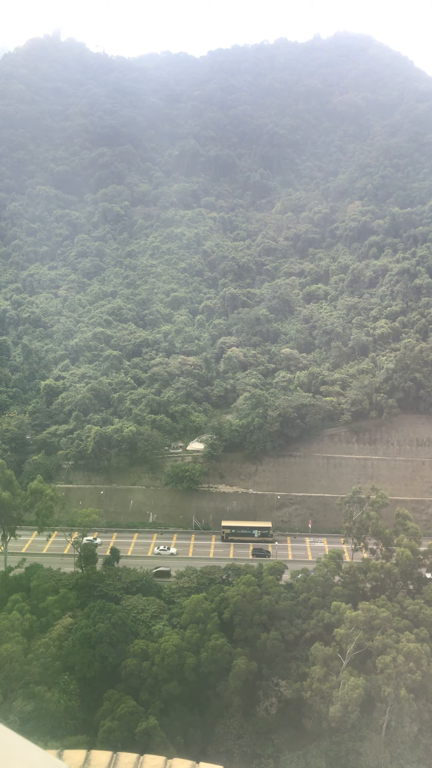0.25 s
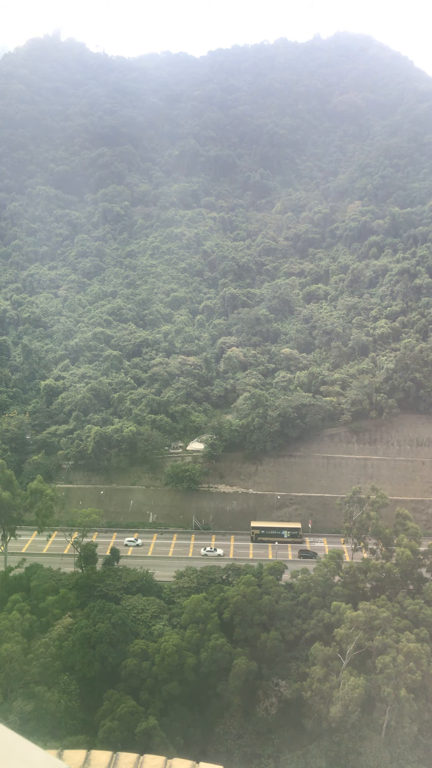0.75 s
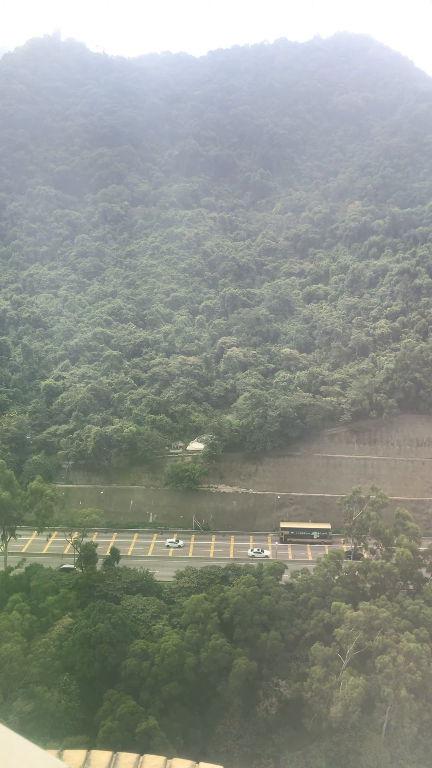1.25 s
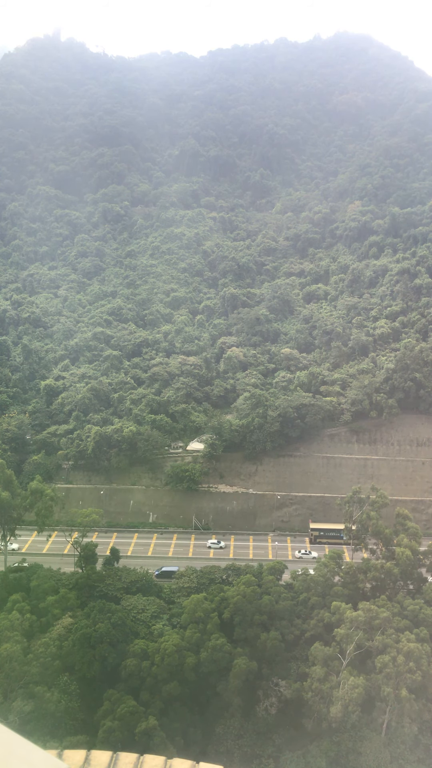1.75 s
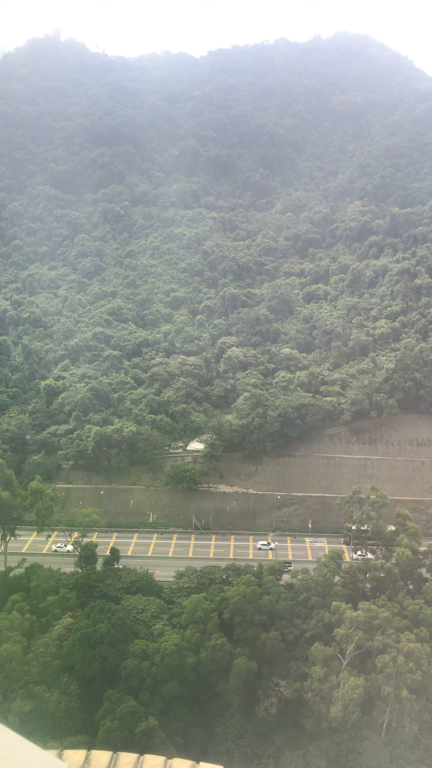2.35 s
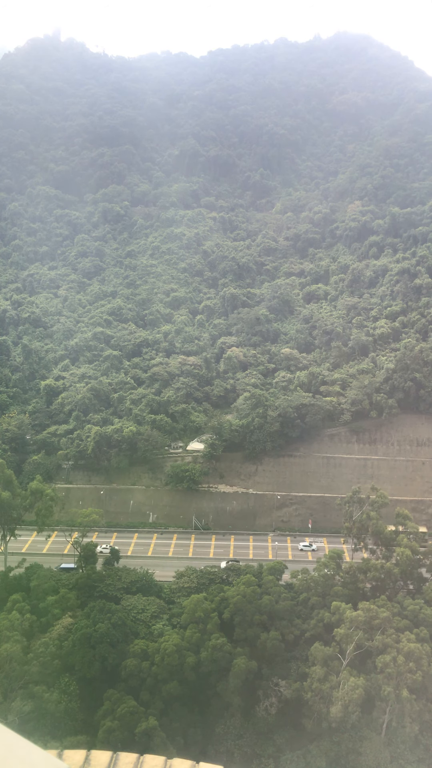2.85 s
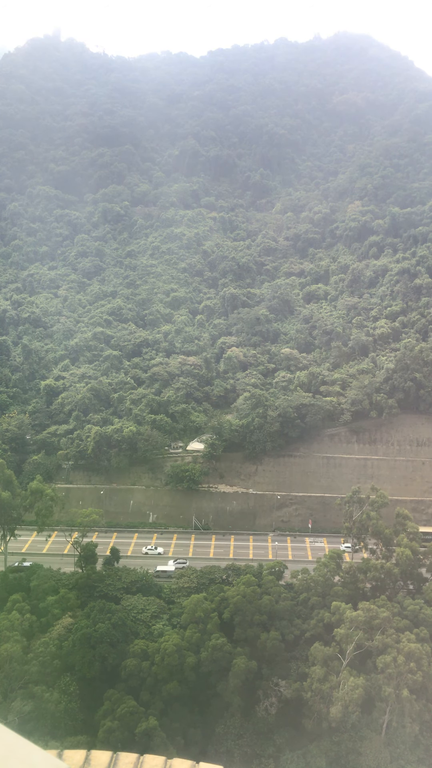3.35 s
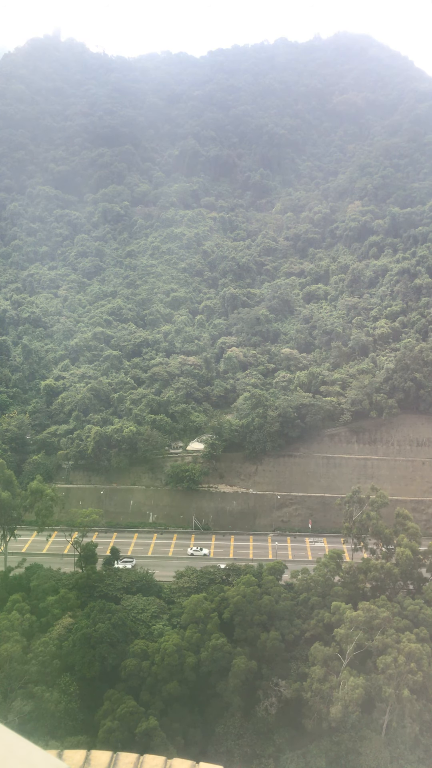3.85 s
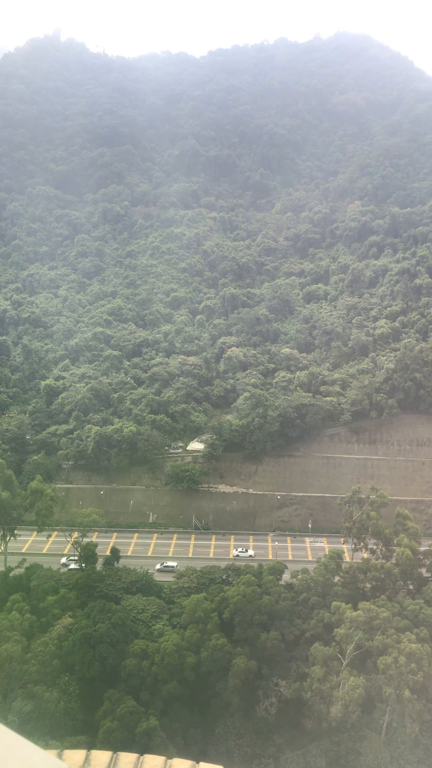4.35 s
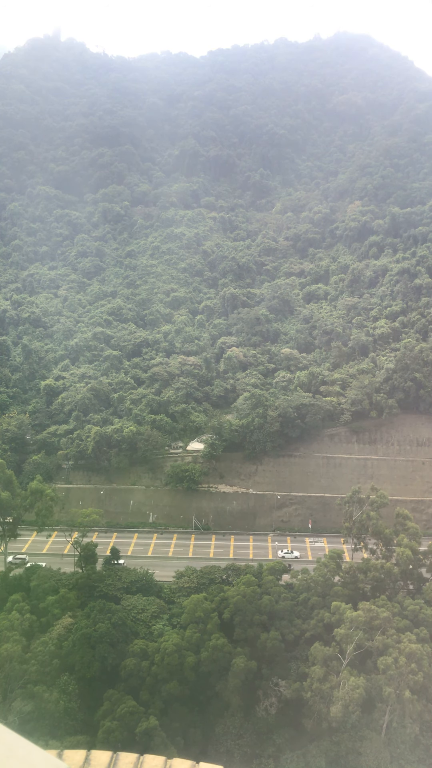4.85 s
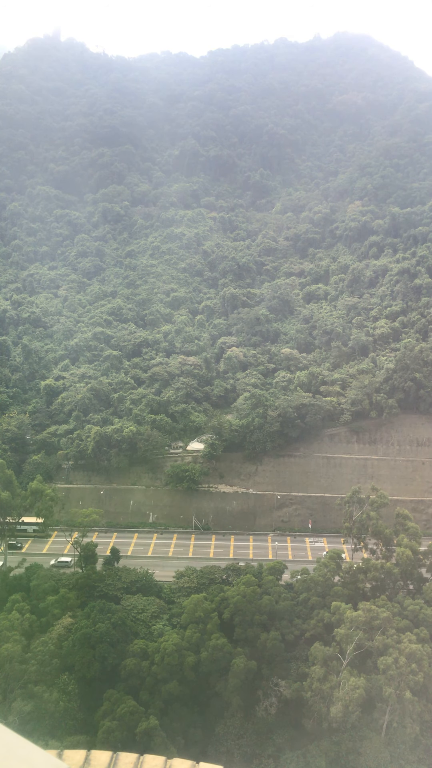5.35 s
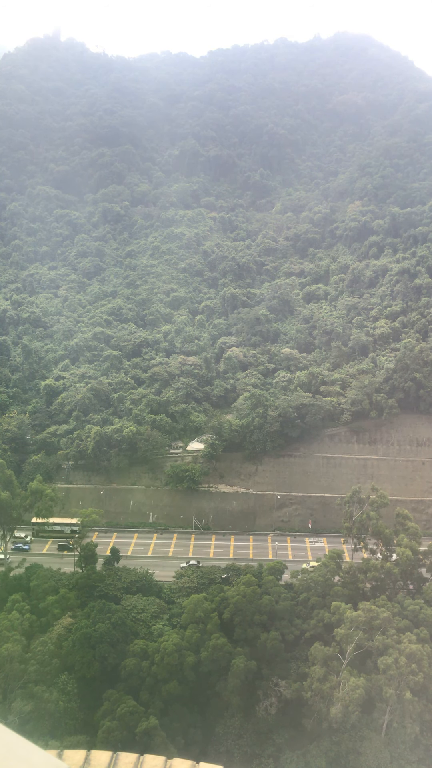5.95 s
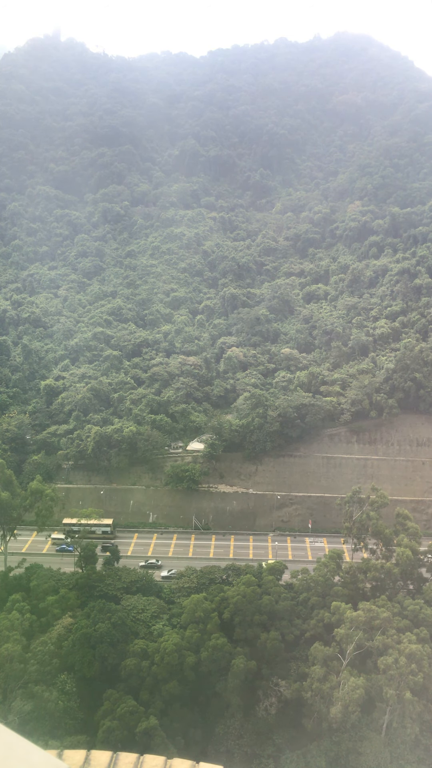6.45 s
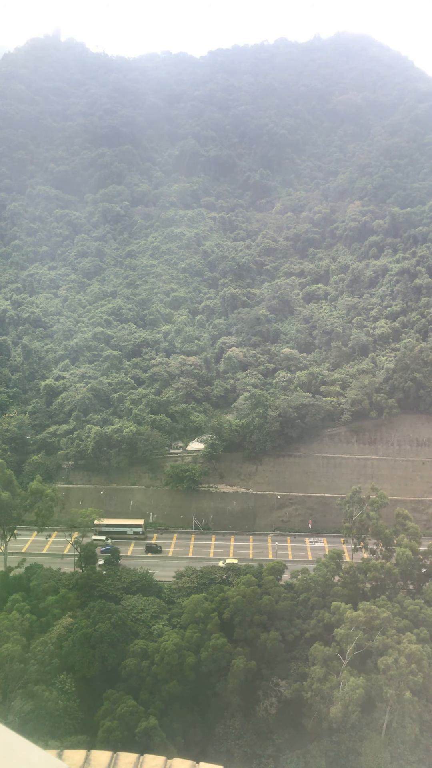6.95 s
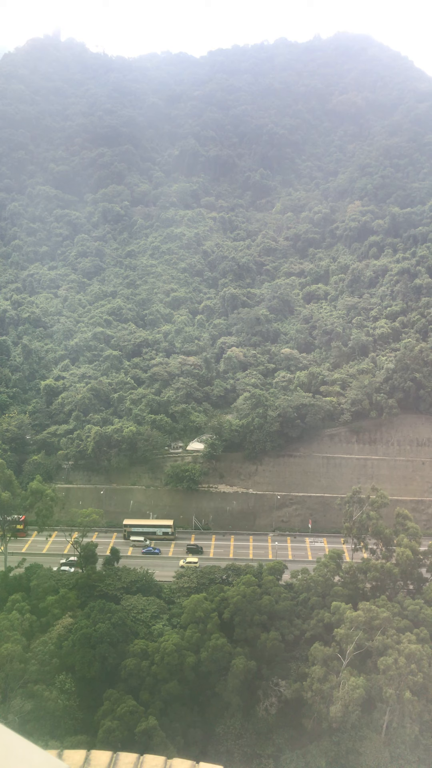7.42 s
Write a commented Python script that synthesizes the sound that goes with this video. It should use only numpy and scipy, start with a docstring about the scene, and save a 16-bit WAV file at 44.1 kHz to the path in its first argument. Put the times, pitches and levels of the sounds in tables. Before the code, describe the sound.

Distant traffic and a wavering fan hum run throughout, with a short bus drone at the start. Vehicles then pass on the road below, their throbbing low rumble and tyre noise building, dipping and coming back softer before dying away. The microphone is indoors by a high window, where one sharp click stands out early, followed by lighter clicks and faint rustles.

```python
"""A busy road heard from a window high above it, over a steady wash of far traffic and a fan's hum.
A bus drones for the first half second. From 1.5 s passing vehicles swell into a booming engine rumble
and a roar of tyres, loudest near 3 s, while a few sharp clicks and soft brushing rustles ring
briefly indoors, in a small hard room. The traffic eases at 4 s, returns more weakly and fades by 7.7 s."""
import sys
import numpy as np
from scipy import signal
from scipy.fft import rfft, irfft, next_fast_len
from scipy.io import wavfile
from scipy.ndimage import uniform_filter1d

SR = 44100
rng = np.random.default_rng(int(sys.argv[2]) if len(sys.argv) > 2 else 0)


def pcm_store(signal):
    """Save signal as 16-bit PCM."""
    levels = np.round(np.clip(np.atleast_2d(signal), -1, 1) * 32767)
    wavfile.write(sys.argv[1], SR, levels.astype(np.int16).T)


N = 338687
TIME_S = np.arange(N) / SR


def gain(db):
    """Decibels to amplitude."""
    return 10 ** (np.asarray(db) / 20)


def unit_rms(x):
    """Scale to rms 1."""
    return x / np.sqrt(np.mean(x ** 2) + 1e-20)


def log_interp(points, hz):
    """Interpolate on a log-frequency axis."""
    points_hz, values = np.transpose(points)
    return np.interp(np.log(hz + 1), np.log(points_hz + 1), values)


def bell(centre, half_width, x=TIME_S):
    """Gaussian of height 1, down to 1/e at half_width."""
    return np.exp(-((x - centre) / half_width) ** 2)


def response(peaks, hz):
    """Gain of a set of bell-shaped peaks and dips."""
    return gain(sum(db * bell(centre_hz, width_hz, hz) for centre_hz, width_hz, db in peaks))


def add(mix, start_s, sound):
    """Mix a sound in at start_s."""
    part = mix[round(start_s * SR):][:len(sound)]
    part += sound[:len(part)]


def noise(spectrum, size=N, tilt_db_per_oct=0):
    """Shaped noise of rms 1, tilted above 1 kHz, rolled off past the last point."""
    length = next_fast_len(size)
    hz = np.fft.rfftfreq(length, 1 / SR)
    octaves = np.log2(np.maximum(hz, 1000) / 1000)
    shape = gain(log_interp(spectrum, hz) + tilt_db_per_oct * octaves)
    shape /= 1 + (hz / (1.3 * spectrum[-1][0])) ** 16
    return unit_rms(irfft(rfft(rng.standard_normal(length)) * shape, length)[:size])


def drift(rate_hz):
    """Random wander of rms 1, up to rate_hz."""
    t = np.arange(0, N / SR + .01, .002)
    hz = np.fft.rfftfreq(len(t), t[1])
    slow = irfft(rfft(rng.standard_normal(len(t))) / (1 + (hz / rate_hz) ** 4), len(t))
    return np.interp(TIME_S, t, unit_rms(slow))


def resonate(x, hz, width_hz):
    """Double-pole resonance, output at rms 1."""
    pole = np.exp((-np.pi * width_hz + 2j * np.pi * hz) / SR)
    return unit_rms(signal.lfilter([1], np.poly([pole, pole]), x).real)


def steady(x, samples):
    """Level out the slow swings of a narrow noise; keep its flutter."""
    power = uniform_filter1d(uniform_filter1d(x ** 2, samples), samples)
    return unit_rms(x / np.sqrt(abs(power) + 1e-12))


# freq_hz, level_db
WASH_SPECTRUM = [(20, -44), (31, -12), (46, -10), (90, -3), (130, -5), (176, -8.5), (234, -11), (270, -10),
                 (330, -11), (430, -17.5), (510, -12.5), (660, -18), (780, -22.5), (1250, -26.5),
                 (2260, -35), (4000, -42.5), (6300, -43.5), (9000, -50.5), (15900, -51)]
def wash():
    """Far traffic and air: broad noise, swaying slightly."""
    return gain(-48.5 + .55 * drift(5)) * noise(WASH_SPECTRUM)


# time_s, level_db
FAN_LEVELS = [(0.05, -47.5), (0.35, -54.5), (1.45, -58.5), (1.7, -52), (2.65, -51), (2.9, -60),
              (3.2, -56.5), (4.55, -52.5), (4.78, -48.5), (5.1, -51.5), (6.4, -54), (6.62, -47),
              (6.98, -53), (7.22, -47.5), (7.68, -59)]
def fan(pitch_hz=323.2):
    """A fan's wavering tone, slowly swelling and easing."""
    turns = np.cumsum(pitch_hz + .5 * drift(6)) / SR
    level_db = np.interp(TIME_S, *np.transpose(FAN_LEVELS)) + .7 * drift(8)
    return gain(level_db) * np.sqrt(2) * np.sin(2 * np.pi * turns)


def bus(pitch_hz=67.9, level_db=-47.5, leaves_s=.52, release_s=.06):
    """Firing note of a bus that drops out of earshot."""
    turns = np.cumsum(pitch_hz + .5 * drift(5)) / SR
    fade = np.exp(-np.maximum(TIME_S - leaves_s, 0) / release_s)
    return gain(level_db) * fade * np.sqrt(2) * np.sin(2 * np.pi * turns)


# pitch_hz, width_hz, level_db
ENGINE_DRONES = [(37, 5, -61), (123.5, 8, -61), (151, 6, -66), (228, 22, -63)]
def far_engines():
    """Distant engines drone in narrow bands of noise."""
    return sum(gain(db) * resonate(rng.standard_normal(N), hz, width_hz)
               for hz, width_hz, db in ENGINE_DRONES)


# freq_hz, level_db
RUSTLE_SPECTRUM = [(600, -4), (1400, 5.5), (3000, 1), (4300, -2), (5000, -2), (5700, 0), (7500, -3.5),
                   (8600, -7), (9800, -7.5), (11500, -8.5), (15900, -8.5)]
# peak_s, half_length_s, level_db, tilt_db_per_oct
RUSTLE_STROKES = [(0.971, 0.05, -66, -5), (3.108, 0.028, -62, 8), (3.716, 0.068, -55.5, -4.5),
                  (3.871, 0.45, -68, -0.5), (4.781, 0.04, -63, -1.5), (4.905, 0.063, -57.5, 0.5),
                  (5.211, 0.14, -65, -1.5), (5.465, 0.042, -51, -2), (6.211, 0.09, -63.5, 1),
                  (6.344, 0.012, -48, -6), (6.385, 0.038, -53.5, -1), (6.566, 0.044, -62, 3),
                  (6.608, 0.01, -50.5, -6), (6.797, 0.087, -61.5, -2.5), (7.17, 0.05, -70, 3),
                  (7.357, 0.1, -65.5, 0.5)]
def rustles(linger_s=.016):
    """Soft strokes of fine friction swell, ease and linger in the room."""
    out, t = np.zeros(N), np.arange(SR) / SR
    hold = np.exp(-1 / (linger_s * SR))
    for peak_s, half_s, db, tilt_db_per_oct in RUSTLE_STROKES:
        power = signal.lfilter([1 - hold], [1, -hold], bell(.5, half_s, t) ** 2)
        friction = noise(RUSTLE_SPECTRUM, len(t), tilt_db_per_oct)
        add(out, peak_s - .5, gain(db) * np.sqrt(power) * friction)
    return out


# freq_hz, t60_s
ROOM_DECAY = [(300, 0.23), (1500, 0.24), (4000, 0.18), (9000, 0.19), (16000, 0.17)]
def room_ring(x, t60_ratio):
    """Each band dies away in the room's decay time, scaled by t60_ratio."""
    hz, t, bands = signal.stft(x, SR, nperseg=256)
    t60_s = t60_ratio * log_interp(ROOM_DECAY, hz)[:, None]
    return signal.istft(bands * gain(-60 * t / t60_s), SR, nperseg=256)[1][:len(x)]


# freq_hz, level_db
CLICK_SPECTRUM = [(200, -10), (500, -3), (800, -1.5), (1300, -0.2), (1900, -.2), (3000, -5.3),
                  (3900, -10.4), (4350, -5), (5000, -11), (5600, -9.5), (7600, -11), (8400, -20),
                  (9000, -16.4), (10000, -17), (11000, -23), (12300, -24), (14400, -27.5), (15900, -33)]
# start_s, level_db, tilt_db_per_oct, cutoff_hz, ring_hz, ring_relative_db, t60_ratio, hardness
CLICK_HITS = [(1.807, -59.5, 4, 18000, 6200, -5, .8, .6), (2.0311, -33.5, .2, 18000, 1300, -10, 1, .38),
              (2.0415, -41, -.5, 10000, 2900, -5, .7, .8), (2.8715, -46.3, -1.3, 18000, 2000, -1, .9, .5),
              (3.6956, -49.2, 2.4, 18000, 3600, -5, 1, .6), (3.825, -51, -.5, 18000, 600, 4, .9, .8),
              (4.3112, -67.3, 13, 18000, 8400, 0, .9, .6), (6.0517, -46.6, 1.5, 18000, 1900, -10, .8, .5),
              (6.335, -47.3, -2, 4000, 1200, -3, 1.1, .3), (7.6085, -43.8, -2, 4500, 1500, -6, 1, .8),
              (7.623, -47, -4, 2500, 1900, -5, .9, .6)]
def clicks(crack_s=.0045, build_s=.034):
    """Short resonant cracks, held up by first reflections; some are bright, others duller."""
    out, t = np.zeros(N), np.arange(SR // 2) / SR
    reflections = 1.4 - 1.05 * np.exp(-t / build_s)
    for start_s, db, tilt_db_per_oct, cutoff_hz, ring_hz, ring_db, t60_ratio, hardness in CLICK_HITS:
        crack = hardness * np.exp(-t / crack_s)
        contact = noise(CLICK_SPECTRUM, len(t), tilt_db_per_oct)
        contact += gain(ring_db) * resonate(rng.standard_normal(len(t)), ring_hz, width_hz=1200)
        click = (crack + reflections) * room_ring(contact, t60_ratio)
        lowpass = signal.butter(3, cutoff_hz, fs=SR, output="sos")
        add(out, start_s, gain(db) * signal.sosfilt(lowpass, click))
    return out


# peak_s, half_length_s, pitch_hz, level_db
MOAN_SWELLS = [(2.42, 0.35, 555, -51.5), (2.557, 0.061, 256, -53), (3.048, 0.077, 425, -48),
               (3.36, 0.079, 352, -48.5), (5.07, 0.76, 324, -58.5)]
def moans():
    """Narrow resonances swell briefly out of the roar."""
    out = np.zeros(N)
    for peak_s, half_s, hz, db in MOAN_SWELLS:
        tone = steady(resonate(rng.standard_normal(N), hz, width_hz=46), samples=3000)
        out += gain(db) * bell(peak_s, half_s) * tone
    return out


def wall_echoes(x, decay_s=.016):
    """Early echoes off near walls make a noise slightly hollow."""
    t = np.arange(SR // 12) / SR
    taps = rng.standard_normal(len(t)) * np.exp(-t / decay_s)
    taps *= .25 / np.linalg.norm(taps)
    taps[0] = 1
    return signal.oaconvolve(x, taps)[:len(x)]


# freq_hz, level_db
TYRE_SPECTRUM = [(600, -1), (720, 3.5), (800, -1.5), (930, 1.8), (1130, -3), (1300, 3), (1600, -4),
                 (2300, -9.5), (3500, -16), (4600, -22), (6200, -23), (7800, -33), (9500, -38),
                 (15900, -48)]
def tyres(rolling_db):
    """Rolling roar, fluttering with the roughness of the road."""
    flutter = gain(drift(25))
    roar = wall_echoes(noise(TYRE_SPECTRUM))
    return gain(-47 + rolling_db) * unit_rms(roar * flutter)


# freq_hz, level_db
BODY_SPECTRUM = [(110, 0.5), (140, 1.5), (165, 2.5), (200, -7), (238, -1.5), (300, -3.5), (355, -2.5),
                 (400, -6.5), (490, -7), (555, -11), (660, -23), (780, -26.5), (1000, -36)]
def engine_body(engines_db):
    """Broad engine noise above the boom."""
    return gain(-40.5 + .75 * engines_db) * noise(BODY_SPECTRUM)


# freq_hz, level_db
SHUDDER_SPECTRUM = [(22, -43), (30, -26), (36, -7), (41, -3), (49, -3.5), (56, -8), (68, -9.5)]
def engine_shudder(engines_db):
    """Deep engine noise below the boom."""
    return gain(-39.5 + .76 * engines_db) * steady(noise(SHUDDER_SPECTRUM), samples=4000)


# freq_hz, width_hz, relative_db
BOOM_RESONANCES = [(87.2, 20, -7), (120, 16, -8.8), (64.2, 7, -19)]
def engine_boom(engines_db, closest_hz=86.6, rise_hz_per_db=.55, waver_hz=3, mean_dip_db=3.3):
    """Engines throb in a narrow boom that dips at random and rises in pitch as they ease."""
    pitch_hz = closest_hz - rise_hz_per_db * engines_db + waver_hz * drift(16)
    turns = np.cumsum(pitch_hz) / SR
    throb = unit_rms(np.sin(2 * np.pi * turns) * gain(1.4 * drift(18)))
    shake = rng.standard_normal(N)
    sides = sum(gain(db) * resonate(shake, hz, width_hz) for hz, width_hz, db in BOOM_RESONANCES)
    level_db = -31.5 + 1.15 * engines_db - mean_dip_db * drift(9) ** 2
    return gain(level_db) * steady(throb + sides, samples=2400)


# time_s, engines_db, rolling_db (relative to the closest pass)
TRAFFIC_LEVELS = [(1.498, -21.5, -27), (1.719, -13, -9.5), (2.0, -6, -2), (2.62, -1, 0), (3.15, -1.5, 0.7),
                  (3.45, -1, -1), (3.68, -5.5, -8.5), (4.0, -12.5, -9.5), (4.28, -14, -10),
                  (4.6, -6.5, -6.5), (4.85, -4.5, -4), (5.25, -6, -7), (5.85, -9, -9), (6.3, -9.5, -8.5),
                  (6.7, -7, -5.5), (7.15, -8.5, -13), (7.68, -19.5, -28)]
# peak_s, half_length_s, boom_lift_db, shudder_lift_db, body_lift_db
RUMBLE_SURGES = [(2.052, 0.051, 6, -10, 4.5), (2.275, 0.031, -5, -7.5, 3), (2.62, 0.065, 6, 2, 3.5),
                 (2.69, .016, -14, 6, 1), (2.752, 0.03, 8, -5, -1.5), (2.835, 0.036, 6, -2, -2),
                 (2.953, .04, 4, 5, -3.5), (3.04, 0.032, -13, 0, 2), (3.168, 0.028, 8.5, 4, 3.5),
                 (3.342, 0.024, 11, -4, 0), (3.413, 0.028, 12, -2, 3), (3.505, 0.016, 7, 4, 1),
                 (3.752, 0.045, 8.5, 13.5, 0), (4.548, 0.028, 8, 3, 0), (4.728, 0.023, 11.5, 3, 0.5),
                 (4.837, 0.039, 2.5, 10.5, 0), (4.917, 0.037, 5, 10.5, 3), (4.975, 0.03, 9, -4, 3.5),
                 (5.203, 0.061, -1, 4.5, 1.5), (5.34, 0.022, 5, 6, -8), (5.64, 0.022, 1, 7, -4),
                 (6.075, 0.045, 8, 7, -1), (6.17, 0.033, -6, -3, -1), (6.462, .04, 5, -1, -1.5),
                 (6.64, 0.04, 4.5, 5, -2), (6.76, 0.047, -9, -0.5, -1), (6.927, 0.06, 8, -10, 1),
                 (7.15, 0.04, 4, -6, -2)]
def passing_traffic():
    """Engines and tyres swell as vehicles pass; the rumble surges and sags briefly."""
    time_s, *levels_db = np.transpose(TRAFFIC_LEVELS)
    engines_db, rolling_db = [np.interp(TIME_S, time_s, db, left=-60) for db in levels_db]
    surges_db = sum(np.outer(db, bell(peak_s, half_s)) for peak_s, half_s, *db in RUMBLE_SURGES)
    boom_lift, shudder_lift, body_lift = gain(surges_db)
    boom = boom_lift * engine_boom(engines_db)
    shudder = shudder_lift * engine_shudder(engines_db)
    body = body_lift * engine_body(engines_db)
    return boom + shudder + body + tyres(rolling_db)


# freq_hz, width_hz, gain_db
STANDING_WAVES = [(105, 6, -3), (200, 14, -2), (351, 10, 3), (385, 10, -2), (408, 8, -2.5), (429, 11, 4),
                  (460, 12, -3), (512, 12, 2), (538, 8, -2.5), (558, 10, 2), (580, 8, -2.5), (602, 10, 2.5),
                  (630, 10, -4), (656, 12, 3), (1246, 22, 3), (1665, 22, 2), (2911, 25, 2), (4178, 14, 3),
                  (4323, 18, 3), (4488, 14, 3), (7281, 16, 3), (7393, 14, 2.5), (7980, 140, 2.5),
                  (8280, 130, -1.5)]
def scene():
    """Road and indoor sounds, coloured by standing waves of the room and window bay."""
    background = wash() + fan() + bus() + far_engines()
    mix = background + passing_traffic() + moans() + clicks() + rustles()
    length = next_fast_len(N + SR // 4)
    room = response(STANDING_WAVES, np.fft.rfftfreq(length, 1 / SR))
    return irfft(rfft(mix, length) * room, length)[None, :N]


# freq_hz, width_hz, gain_db
MIC_PORT_DIPS = [(786, 23, -12), (4970, 220, -4), (10420, 370, -4.6)]
def record(dry):
    """Steep bass cut, then the microphone port's narrow dips and the band limit."""
    bass_cut_hz, top_hz = 29, 15920
    length = next_fast_len(N + SR // 2)
    bins_hz = np.fft.rfftfreq(length, 1 / SR)
    bass_cut = 1 - 1 / (1 + (bins_hz / bass_cut_hz) ** 10)
    trimmed = irfft(rfft(dry, length) * bass_cut, length)[:, :N]
    hz = np.linspace(0, SR / 2, 1025)
    port = response(MIC_PORT_DIPS, hz) * (hz < top_hz)
    taps = signal.firwin2(1023, hz, port, window=("kaiser", 9), fs=SR)
    return signal.oaconvolve(trimmed, taps[None], "same")


dry = scene()
out = record(dry)
pcm_store(out)
```